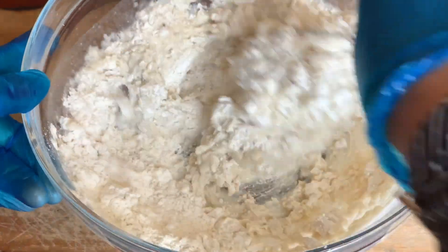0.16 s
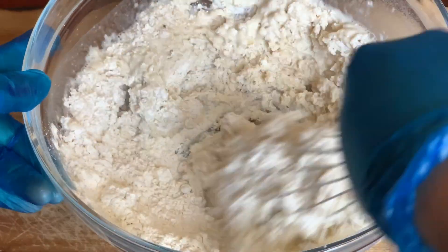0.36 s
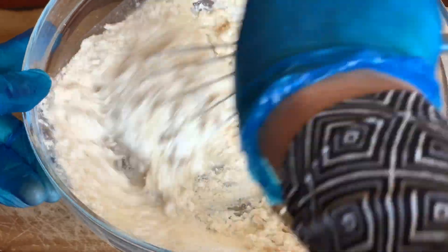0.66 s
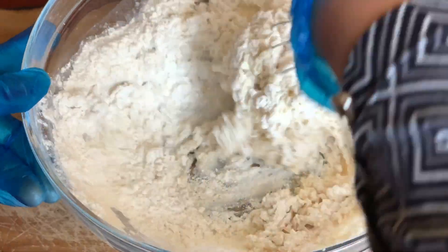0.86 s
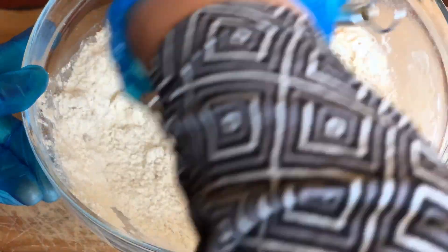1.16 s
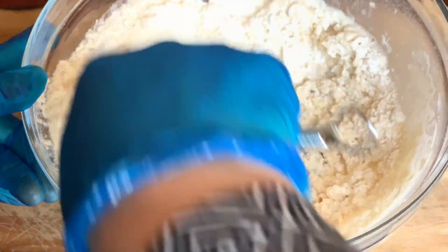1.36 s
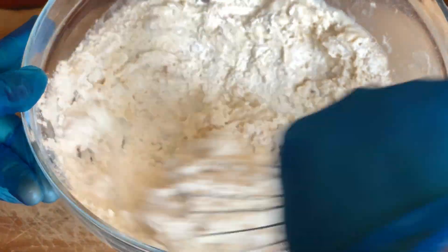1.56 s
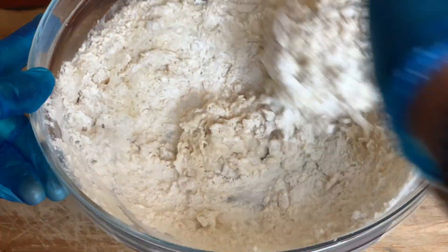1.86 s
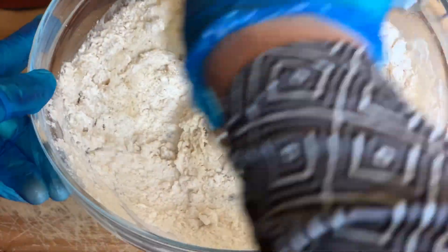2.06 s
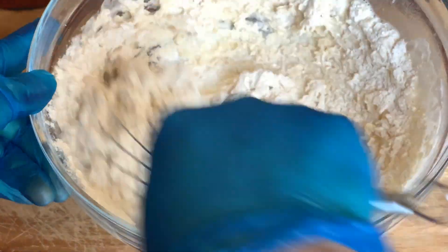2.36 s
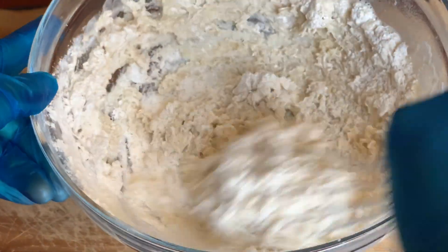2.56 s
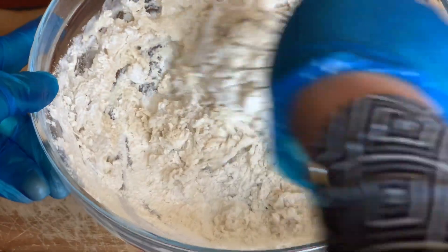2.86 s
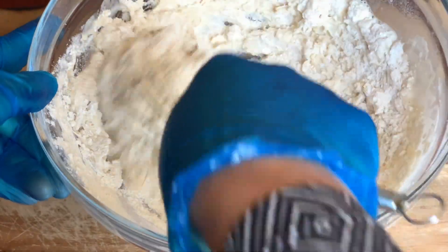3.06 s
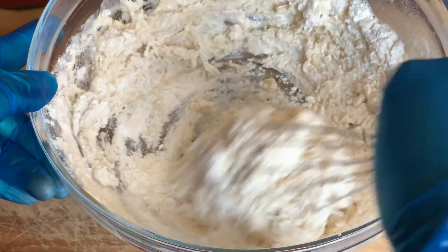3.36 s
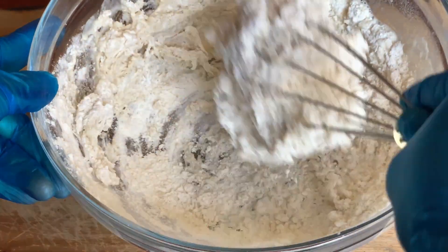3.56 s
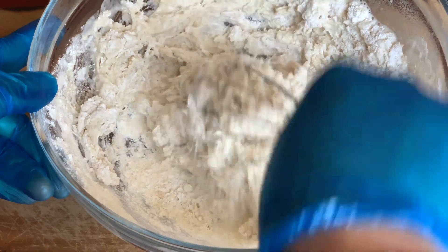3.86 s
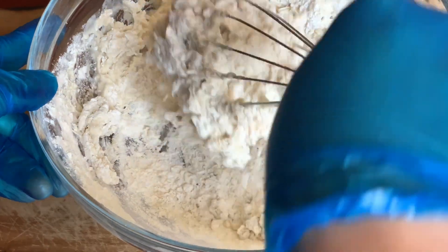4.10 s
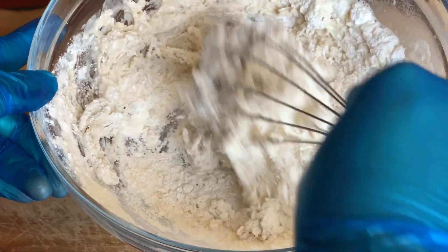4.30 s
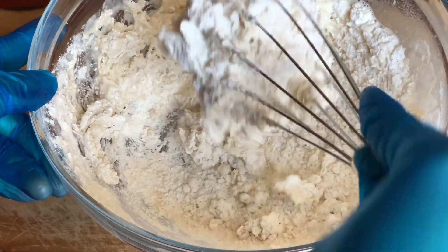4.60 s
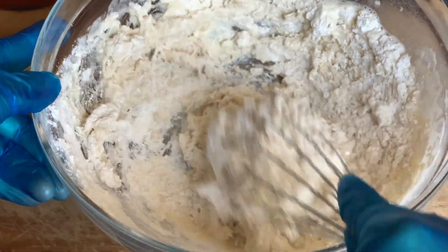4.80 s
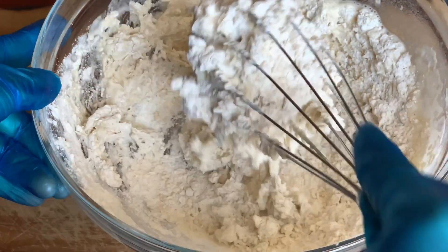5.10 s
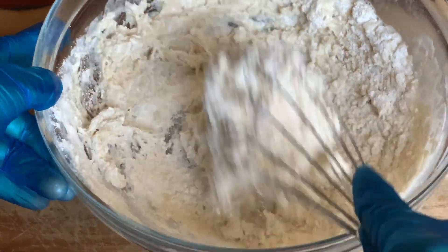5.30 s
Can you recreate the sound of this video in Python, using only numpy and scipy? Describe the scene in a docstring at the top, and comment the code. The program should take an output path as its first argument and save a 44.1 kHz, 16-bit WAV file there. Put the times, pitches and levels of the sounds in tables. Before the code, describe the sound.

A wire whisk stirs flour and water into dough, making soft crackles, wet squelches and tiny ticks. The glass bowl rocks on a wooden table with each turn, alternating light clacks and dull thuds. A harder knock comes past the middle. Near the end the whisk hits the glass twice, and the bowl rings briefly, jumps and clatters down. The microphone is just above the bowl in a small kitchen with a faint hum.

```python
"""A wire whisk works flour and water into dough in a glass bowl on a wooden table, in a small kitchen.
The dough crackles and squelches as a multitude of tiny ruptures. The bowl rocks with each turn, a clack
one way and a dull thud back, each impact exciting damped modes of bowl, table and room.
At the end the whisk is knocked against the glass to shake off dough; the bowl rings, jumps and clatters
down. Beneath it all lie the table's rumble, the room's drone and hush, and a faint appliance whine."""
import sys
import numpy as np
from scipy import signal
from scipy.fft import rfft, irfft
from scipy.io import wavfile

SR = 44100
rng = np.random.default_rng(int(sys.argv[2]) if len(sys.argv) > 2 else 0)


def waveform_to_disk(signal):
    """Save audio, clipped to [-1, 1], as 16-bit WAV at the path in sys.argv[1]."""
    frames = np.transpose(np.atleast_2d(signal))
    scaled = np.clip(frames, -1, 1) * 32767
    samples = np.round(scaled).astype(np.int16)
    wavfile.write(sys.argv[1], SR, samples)


N = 239992
TIME = np.arange(N) / SR
AGE = TIME[:SR]   # time since a blow [s]

# the arm bears down and the table sways harder: (time [s], level [dB])
SHOVES = [(.87, -38), (3.79, -28.5), (4.12, -30), (4.739, -26), (5.21, -29.5)]
# low resonances of the kitchen: (frequency [Hz], bandwidth [Hz], level [dB])
DRONE_BANDS = [(55.6, 41, -55), (98.2, 25.6, -59.5), (147.8, 15.6, -60), (180.3, 72, -60.5)]
# partials of a whining appliance: (frequency [Hz], level [dB])
WHINE_PARTIALS = [(1034.5, -66.5), (2640, -83.5)]
# spectra of the background and of the dough: (frequency [Hz], relative spectral level [dB])
RUMBLE_SPECTRUM = [(11, -2.5), (18, 12), (24, -2.5), (38, -6.5), (66, -16), (86, -39), (150, -120)]
HUSH_SPECTRUM = [(130, -30), (220, -3.5), (344, -6.5), (435, -5), (580, -8.5), (845, -3), (941, -11.5),
                 (1030, -14), (1130, -9.5), (2570, -16.5), (3880, -27.5), (8850, -25.5), (15200, -34.5),
                 (16000, -53)]
CRACKLE_SPECTRUM = [(1760, -24), (3000, -2), (3680, 2), (4600, -4), (5440, -7), (9070, 1), (11100, -20),
                    (14900, -5), (16000, -12)]
SQUELCH_SPECTRUM = [(150, -26), (250, 8.5), (462, -10), (498, -15.5), (802, -11), (968, -26), (1010, -10),
                    (5000, -22.5), (6500, -51), (11000, -120)]
SWISH_SPECTRUM = [(1500, 15.5), (3500, -8), (6000, -7.5), (9000, -5.5), (11000, -18), (15000, -20)]
# how briskly the wires cut through flour: (time [s], effort [dB])
EFFORT = [(0.0, -63.5), (0.18, -64.5), (0.37, -68), (1.0, -71), (1.38, -70), (1.69, -66.5), (2.72, -69),
          (3.06, -68.5), (3.37, -73), (3.71, -72.5), (3.92, -68.5), (4.01, -68), (4.29, -71.5),
          (4.6, -72.5)]
# thick strands of dough tear: (time [s], level [dB], tick frequency [Hz], pop relative to tick [dB])
SNAPS = [(0.146, -45, 6580, 1), (0.2268, -44.5, 7570, -2), (0.4444, -38, 7300, -11),
         (0.5753, -48.5, 7880, -7), (0.9898, -49, 4710, -6), (1.6047, -48, 9090, -6),
         (1.6319, -44, 4200, 5.5), (1.7155, -46, 5100, -6), (1.8048, -40.5, 4400, -4),
         (1.8761, -51, 6830, 10.5), (2.635, -47, 8520, -1), (3.0664, -41.5, 8740, -6),
         (3.0919, -33, 7740, -6), (3.8858, -40, 9200, 1)]
# the loaded whisk drags through dry flour: (time [s], level [dB], half-length [s])
SWISHES = [(3.767, -48.5, 0.05), (4.131, -52.5, 0.028)]

# impacts of the bowl on the table: (time [s], level [dB], relative table boom [dB])
THUDS = [(.001, -30.5, 11), (1.0331, -33.5, 5.5), (1.828, -32, 10.5), (2.7334, -32, 5.5), (3.3464, -31, 5),
         (3.726, -24, 9), (3.741, -20, -21)]   # it rocks back on its dull side
CLACKS = [(0.3233, -22, 6), (0.6903, -29.5, 6.5), (1.454, -22.5, 6), (2.3877, -19.5, 5.5),
          (3.2686, -26.5, 4.5), (3.7353, -7, -2), (4.1464, -20.5, 2.5), (4.6564, -5.5, 7),
          (5.1155, -6.5, 11)]   # its glass foot tips onto the wood
LANDINGS = [(4.7122, -2.5, -8.5), (4.7206, -8, 0.5), (4.7326, -17.5, -10), (4.7447, -10, -9),
            (4.7923, -23, -12), (5.1744, -5, 3.5), (5.1783, -11, -10), (5.2364, -12, 6.5),
            (5.2514, -14, 10.5)]   # it lands and bounces
# wires strike the glass: (time [s], level [dB], frequency favoured by the spot [Hz])
TAPS = [(2.381, -49, 8600), (3.7427, -41, 8600), (4.6437, -34.5, 8700), (4.6453, -20.5, 8600),
        (4.711, -37, 8600), (5.0998, -29.5, 9500), (5.1025, -18.5, 6700), (5.1074, -37, 6900)]
# a wire springs free: (time [s], level [dB])
PINGS = [(2.4117, -44), (2.469, -55)]
# normal modes: (frequency [Hz], relative level [dB], T60 [s])
THUD_MODES = [(403, -11.5, 0.067), (527, -7.5, 0.0084), (760, -0.5, 0.022), (1310, -9.5, 0.021),
              (1760, -9, 0.0017)]
CLACK_MODES = [(1530, -6.5, 0.0064), (2010, -4, 0.0083), (3630, -26.5, 0.0039), (493.5, -18.5, 0.16),
               (570, -17.5, 0.14), (970, -65, 0.043)]
LANDING_MODES = [(322, -13.5, 0.087), (658, -10, 0.048), (1450, -7, 0.0098), (2110, -6.5, 0.015),
                 (3520, -19, 0.0013), (4960, -27, 0.01)]
TABLETOP_MODES = [(105.86, -19.5, 0.6), (84, -24.5, 0.18), (208.6, -27.5, 0.25)]
KITCHEN_MODES = [(311, -21.5, 0.25), (596, -26, 0.35), (753, -29, 0.53), (974, -30, 0.53),
                 (1050, -60, 0.23), (1236, -28, 0.4), (1458, -34, 0.56)]   # standing waves of the room
GLASS_MODES = [(420, -17, .1), (1879, -3, .1), (2896, -12, .12), (4086, -20, .07), (5410, -10, .045),
               (6422, -7, .025), (6874, -7, .07), (6960, -13, .14), (7574, -10, .025), (8520, -5, .07),
               (9044, -8, .03), (12200, -28, .12), (14530, -19, .02)]
WIRE_MODES = [(4060, -3.5, 0.042), (5450, -20, 0.085), (6960, -16, .05), (8600, -4.5, 0.042),
              (10300, -17, .03), (12200, -17, .03)]
# spectra that the blows radiate into the room: (frequency [Hz], relative spectral level [dB])
THUD_SPECTRUM = [(70, 16), (150, 0), (250, -17), (400, 4), (600, -1.5), (900, 2.5), (1130, -9.5),
                 (1350, -11), (2000, -13), (3000, -41), (6000, -45), (15000, -60)]
CLACK_SPECTRUM = [(70, 6.5), (150, 1.5), (300, -5.5), (430, -0.5), (540, 3), (750, -8.5), (920, 1),
                  (1140, -10), (1500, -2), (2200, -12), (2800, -22), (4000, -33.5), (6000, -40),
                  (15000, -56)]
LANDING_SPECTRUM = [(70, -3), (200, 1), (550, 0.5), (1000, 1), (1500, 0), (2200, -6), (2800, -16.5),
                    (4000, -29), (6000, -36), (8500, -37.5), (11000, -59), (15000, -60)]
GLASS_SPECTRUM = [(300, -36), (2000, -4), (5000, -9), (6900, -7.5), (7700, -7), (8700, -7), (10000, -15.5),
                  (15000, -25)]
# reverberation time of the kitchen: (frequency [Hz], T60 [s])
KITCHEN_T60 = [(80, 0.63), (250, 0.79), (600, 0.62), (1500, 0.51), (4000, 0.52), (8000, 0.41),
               (15000, 0.29)]


def from_db(db):
    """Amplitude ratio: a factor of ten per 20 dB."""
    return 10 ** (np.asarray(db) / 20)


def unit_rms(x):
    """Normalisation to unit mean power."""
    return x / np.sqrt(np.mean(x ** 2) + 1e-20)


def at_hz(points, hz):
    """Interpolation on a logarithmic frequency axis."""
    known, values = np.transpose(points)
    return np.interp(np.log(hz + 1e-9), np.log(known), values)


def colour(x, spectrum):
    """Spectral shaping, with a steep roll-off below the first point."""
    hz = np.fft.rfftfreq(len(x), 1 / SR)
    roll_off = np.minimum(hz / spectrum[0][0], 1) ** 4
    return irfft(rfft(x) * from_db(at_hz(spectrum, hz)) * roll_off, len(x))


def noise(spectrum, length=N):
    """Stationary coloured noise, rms 1."""
    return unit_rms(colour(rng.standard_normal(length), spectrum))


def drift(rate_hz):
    """Slow random fluctuation from low-passed noise, rms 1."""
    hz = np.fft.rfftfreq(N, 1 / SR)
    return unit_rms(irfft(rfft(rng.standard_normal(N)) / (1 + (hz / rate_hz) ** 4), N))


def swell_at(s, half_s):
    """Gaussian envelope centred on time s, peak 1."""
    return np.exp(-((TIME - s) / half_s) ** 2)


def resonate(x, hz, width_hz):
    """Two-pole resonance with unit peak gain."""
    radius = np.exp(-np.pi * width_hz / SR)
    feedback = [1, -2 * radius * np.cos(2 * np.pi * hz / SR), radius ** 2]
    return signal.lfilter(np.array([1, 0, -1]) * (1 - radius ** 2) / 2, feedback, x + 1e-18)


def add(out, s, sound):
    """Superposition of a sound starting at time s."""
    start = int(np.clip(round(s * SR), 0, N - 1))
    out[start:start + len(sound)] += sound[:N - start]


def ring(modes, contact_s):
    """Modal vibration: modes build up during contact, are in phase as it ends, and decay exponentially."""
    out = 0
    for hz, level_db, t60 in modes:
        envelope = (1 - np.exp(-(AGE / contact_s) ** 4)) * from_db(-60 * AGE / t60)
        out += from_db(level_db) * envelope / envelope.max() * np.sin(2 * np.pi * hz * (AGE - contact_s))
    return out


def burst(hz, width, swell_s):
    """Transient: milliseconds of noise excite a resonance of fractional bandwidth `width`; peak 1."""
    age = AGE[:SR // 20]
    force = rng.standard_normal(len(age)) * age * np.exp(-age / swell_s)
    sound = resonate(resonate(force, hz, width * hz), hz, width * hz)
    return sound / np.abs(sound).max()


def grains(spectrum, low_hz, high_hz, per_s, spread_db, width):
    """Shot noise: clustered impulses of uneven size excite heavily damped resonances; rms 1."""
    born = rng.random(N) < per_s * from_db(4 * drift(25)) / SR
    sizes = from_db(spread_db * np.minimum(rng.exponential(1, N), 3.5))
    pops = born * sizes * rng.choice([-1, 1], N)
    pitches, band = np.geomspace(low_hz, high_hz, 10), rng.integers(0, 10, N)
    sound = sum(resonate(pops * (band == k), hz, width * hz) for k, hz in enumerate(pitches))
    return unit_rms(colour(sound, spectrum))


def kitchen(early_db, early_s):
    """Room impulse response: strong early reflections, then a tail that dies sooner in the treble."""
    white, hz, tail = rfft(rng.standard_normal(SR)), np.fft.rfftfreq(SR, 1 / SR), 0
    centres = np.geomspace(60, 16000, 10)
    for centre, share in zip(centres, np.eye(len(centres))):
        band = irfft(white * at_hz(np.c_[centres, share], hz), SR)
        tail += band * from_db(-60 * AGE / at_hz(KITCHEN_T60, centre))
    return tail * (1 + from_db(early_db) * np.exp(-AGE / early_s))


def reverberation(spectrum, early_db, early_s, arrival_s=0.00086):
    """Diffuse field of one blow: the room response filtered by its spectrum; rms 1 over the first 0.1 s."""
    sound = colour(kitchen(early_db, early_s), spectrum) * (1 - np.exp(-(AGE / arrival_s) ** 2))
    fade = np.minimum(1, 2 * (1 - AGE))
    return fade * sound / np.std(sound[:SR // 10])


def table_rumble(sway_db=-42.5):
    """Forced vibration: the arm's shoves add in power to the table's steady sway."""
    shoves = np.max([from_db(db) * swell_at(s, half_s=0.11) for s, db in SHOVES], axis=0)
    return np.hypot(from_db(sway_db), shoves) * noise(RUMBLE_SPECTRUM)


def room_tone(hush_db=-61, waver_hz=1.2):
    """Ambient noise: a narrow-band drone, an appliance's frequency-modulated whine and a broad hush."""
    drone = whine = 0
    for hz, width_hz, db in DRONE_BANDS:
        band = resonate(rng.standard_normal(N), hz, width_hz)
        drone += from_db(db) * unit_rms(resonate(band, hz, width_hz))
    for hz, db in WHINE_PARTIALS:
        phase = 2 * np.pi * np.cumsum(hz + waver_hz * drift(3.7)) / SR
        whine += from_db(db) * np.sqrt(2) * np.sin(phase)
    return drone + whine + from_db(hush_db) * noise(HUSH_SPECTRUM)


def crackle(effort_db, flour_db=-73, crumb_db=-76, crumbs_per_s=110, spread_db=3):
    """Fracture noise: the wires cut flour and break small lumps, each at a pitch of its own."""
    flour = grains(CRACKLE_SPECTRUM, 3000, 14000, per_s=2500, spread_db=3, width=0.44)
    crumbs = np.zeros(N)
    for when, size, pitch in rng.random((int(crumbs_per_s * N / SR), 3)):
        strength = from_db(spread_db * min(-np.log(1 - size), 3))
        add(crumbs, when * N / SR, strength * burst(3500 + 6000 * pitch, width=1.0, swell_s=0.00069))
    return from_db(effort_db) * (from_db(flour_db) * flour + from_db(crumb_db) * unit_rms(crumbs))


def squelch(effort_db, steady_db=-68, press_db=-68.5, lead_s=0.069):
    """Compression of wet dough: its pops swell as it is pressed to the wall just before the bowl rocks."""
    pressing = np.max([swell_at(s - lead_s, half_s=0.087) for s, _, _ in CLACKS + THUDS], axis=0)
    envelope = from_db(effort_db) * (from_db(steady_db) + from_db(press_db) * pressing)
    return envelope * grains(SQUELCH_SPECTRUM, 430, 4900, per_s=530, spread_db=3.5, width=0.82)


def dough(usual_effort_db=-67, effort_swing=1.5, room_db=-8):
    """Direct plus reverberant sound of the dough; one effort modulates crackle, squelch and thin snaps."""
    effort_db = effort_swing * (np.interp(TIME, *np.transpose(EFFORT)) - usual_effort_db)
    direct = crackle(effort_db) + thick_snaps() + squelch(effort_db) + swishes() + thin_snaps(effort_db)
    room = kitchen(early_db=-7, early_s=0.011)
    return direct + from_db(room_db) * signal.fftconvolve(direct, room / np.linalg.norm(room))[:N]


def knocks(rows, modes, spectrum, contact_s, room_db, table_db, room_ring_db, bright_db,
           early_db, early_s, variation):
    """Impact excitation of bowl, table and room; the contact point shifts, varying the reverberation."""
    out, usual_room = np.zeros(N), reverberation(spectrum, early_db, early_s)
    direct = ring(modes, contact_s)
    tabletop, room_ring = ring(TABLETOP_MODES, contact_s=0.0045), ring(KITCHEN_MODES, contact_s=0.008)
    for s, level_db, boom_db in rows:
        room = usual_room + variation * reverberation(spectrum, early_db, early_s)
        sound = direct + from_db(room_db) * room / np.hypot(1, variation)
        # hard blows are brighter and set the kitchen's mid-pitched resonances ringing more
        hardness = from_db(level_db / 2)
        sound += hardness * from_db(bright_db) * resonate(sound, hz=3930, width_hz=1770)
        ringing = from_db(table_db + boom_db) * tabletop + hardness * from_db(room_ring_db) * room_ring
        add(out, s, from_db(level_db) * (sound + ringing))
    return out


def bowl():
    """Impacts of a rocking, then bouncing body: the longer contact of the thuds gives a softer attack."""
    clacks = knocks(CLACKS, CLACK_MODES, CLACK_SPECTRUM, contact_s=0.001225, room_db=-21.5, table_db=-1,
                    room_ring_db=-5, bright_db=10.5, early_db=-7.5, early_s=0.048, variation=0.76)
    thuds = knocks(THUDS, THUD_MODES, THUD_SPECTRUM, contact_s=0.00201, room_db=-12, table_db=0.5,
                   room_ring_db=19.5, bright_db=-2, early_db=3, early_s=0.02, variation=0.34)
    landings = knocks(LANDINGS, LANDING_MODES, LANDING_SPECTRUM, contact_s=0.001125, room_db=-18.5,
                      table_db=-0.5, room_ring_db=7, bright_db=7, early_db=-2, early_s=0.019,
                      variation=1.14)
    return clacks + thuds + landings


def snap(tick_hz, pop_db, pop_hz=2200):
    """Tensile rupture: a strand of dough parts with a bright tick and a lower wet pop."""
    tick = burst(tick_hz, width=0.6, swell_s=0.00059)
    return tick + from_db(pop_db) * burst(pop_hz, width=0.58, swell_s=0.0007)


def thin_snaps(effort_db, usual_per_s=12, low_hz=4600, high_hz=9500):
    """A random point process: thin strands tear more often and louder as the effort grows."""
    out = np.zeros(N)
    count_due = np.cumsum(usual_per_s * from_db(1.8 * effort_db)) / SR
    for k, (when, size, pitch) in enumerate(rng.random((int(count_due[-1]), 3))):
        start = min(np.searchsorted(count_due, k + when), N - 1)
        strength = from_db(-50 + 0.39 * effort_db[start] + 4 * size)
        add(out, start / SR, strength * snap(low_hz * (high_hz / low_hz) ** pitch, pop_db=-1))
    return out


def thick_snaps():
    """Isolated ruptures: thick strands tear one at a time."""
    out = np.zeros(N)
    for s, level_db, tick_hz, pop_db in SNAPS:
        add(out, s, from_db(level_db) * snap(tick_hz, pop_db))
    return out


def whisk_taps(room_db=-27, click_db=-9, click_s=0.0017, favour_db=6, favour_octaves=0.1, detune=0.0057):
    """Point excitation of glass by wire: the spot favours some modes, and the wire's load detunes them."""
    out = np.zeros(N)
    for s, level_db, spot_hz in TAPS:
        modes = []
        for hz, db, t60 in GLASS_MODES:
            nearness = np.exp(-(np.log2(hz / spot_hz) / favour_octaves) ** 2)
            modes.append((hz * rng.normal(1, detune), db + favour_db * nearness, t60))
        click = from_db(click_db) * noise(GLASS_SPECTRUM, SR) * np.exp(-AGE / click_s)
        room = from_db(room_db) * reverberation(GLASS_SPECTRUM, early_db=-19, early_s=0.02)
        add(out, s, from_db(level_db) * (ring(modes, contact_s=0.00043) / 2 + click + room))
    return out


def wire_pings():
    """Free vibration: a bent wire lets go and rings in its own modes."""
    out = np.zeros(N)
    for s, level_db in PINGS:
        add(out, s, from_db(level_db) * ring(WIRE_MODES, contact_s=0.00082))
    return out


def swishes():
    """Granular friction: dense tiny pops merge into a hiss as the whisk drags through dry flour."""
    drag = sum(from_db(level_db) * swell_at(s, half_s) for s, level_db, half_s in SWISHES)
    return drag * grains(SWISH_SPECTRUM, 2000, 13000, per_s=4000, spread_db=1.5, width=0.73)


def landing_cracks(crack_db=-17, exponent=2.25):
    """Nonlinear contact: glass meets wood with a crack that grows faster than the force of the landing."""
    out = np.zeros(N)
    for s, level_db, _ in LANDINGS:
        add(out, s, from_db(crack_db + exponent * level_db) * burst(hz=6000, width=0.58, swell_s=0.0009))
    return out


def scene():
    """Superposition of all sources in one channel, as heard from just above the bowl."""
    return (bowl() + whisk_taps() + wire_pings() + table_rumble() + room_tone()
            + dough() + landing_cracks())[None]


def record(dry):
    """Soft saturation rounds the loudest peaks at full scale; a low-pass filter cuts the extreme treble."""
    limited = dry / (1 + dry ** 10) ** (1 / 10)
    cutoff_hz = 15750
    return signal.sosfilt(signal.ellip(10, 0.1, 80, cutoff_hz, fs=SR, output="sos"), limited)


dry = scene()
out = record(dry)
waveform_to_disk(out)
```